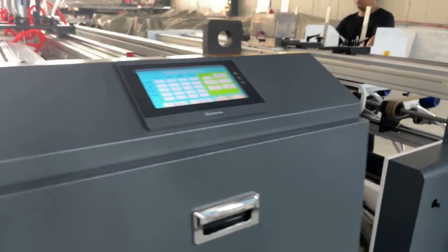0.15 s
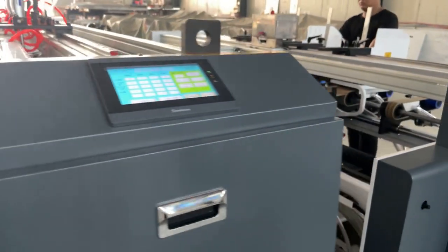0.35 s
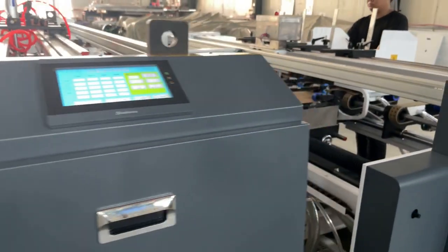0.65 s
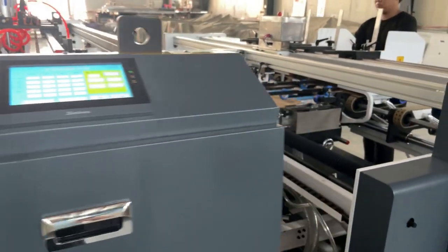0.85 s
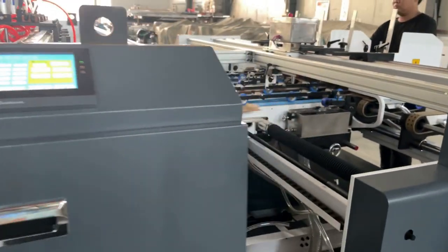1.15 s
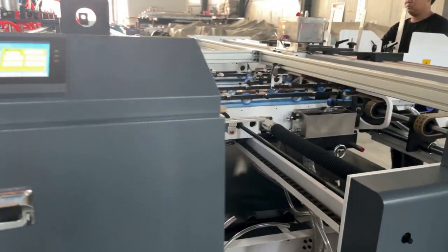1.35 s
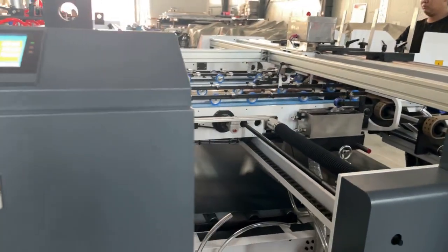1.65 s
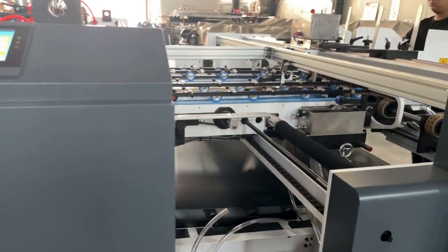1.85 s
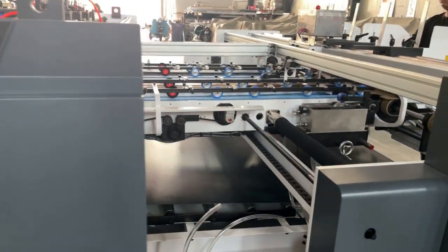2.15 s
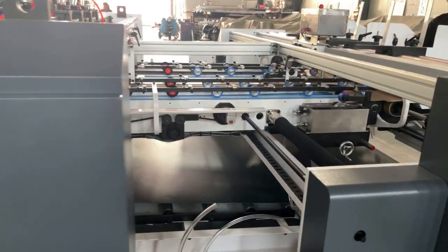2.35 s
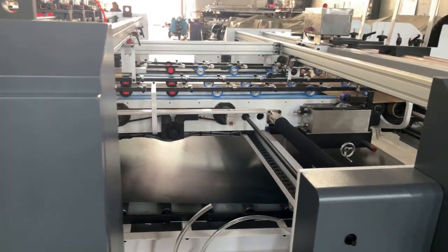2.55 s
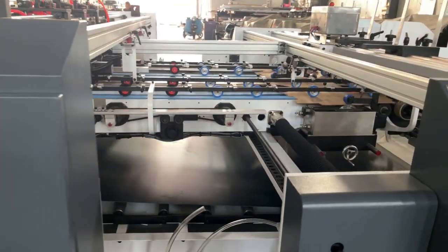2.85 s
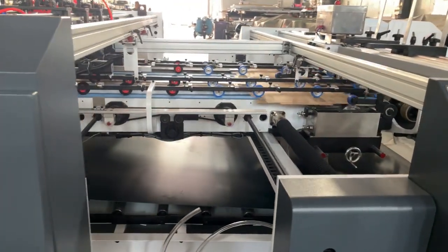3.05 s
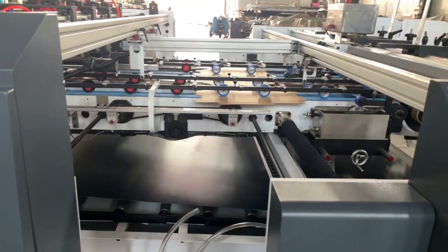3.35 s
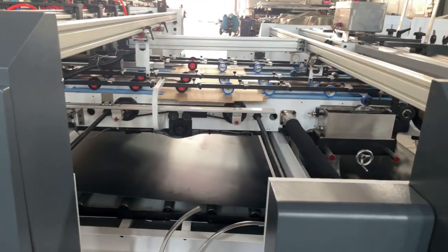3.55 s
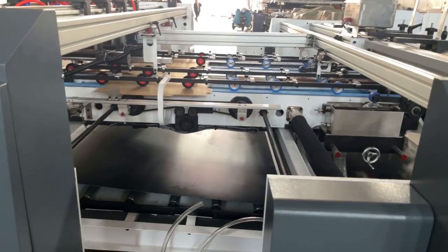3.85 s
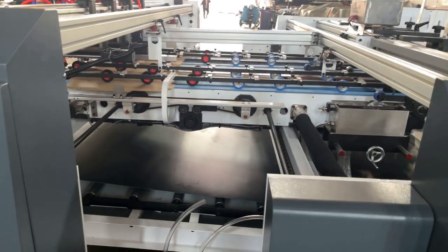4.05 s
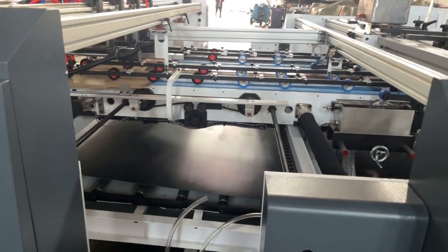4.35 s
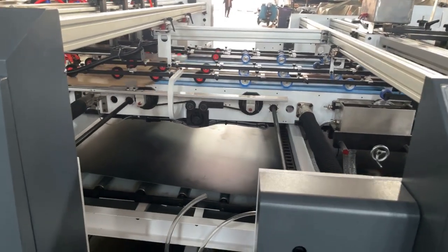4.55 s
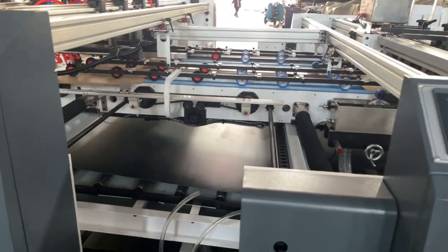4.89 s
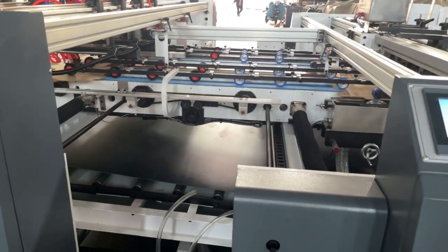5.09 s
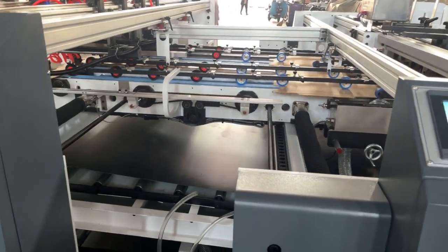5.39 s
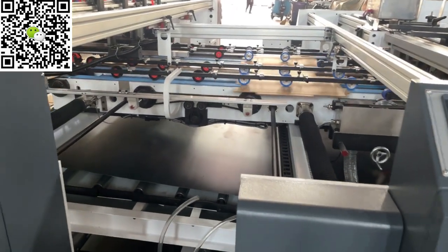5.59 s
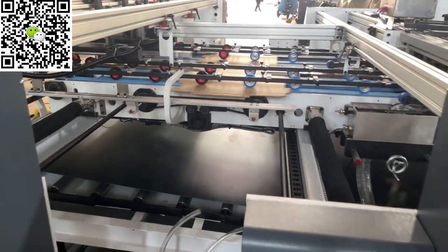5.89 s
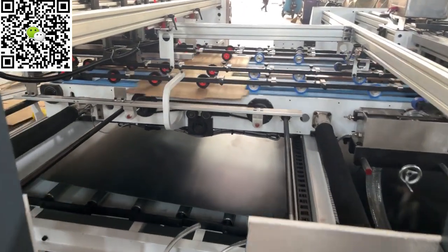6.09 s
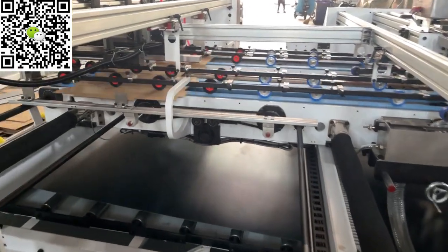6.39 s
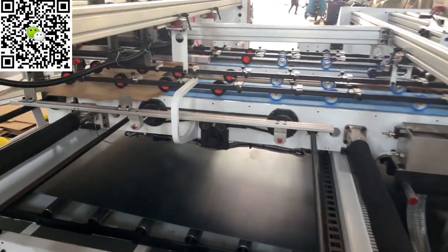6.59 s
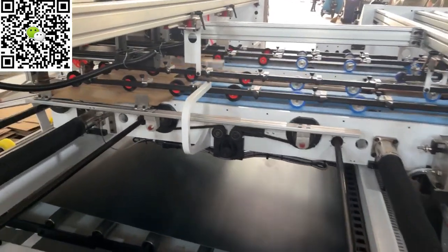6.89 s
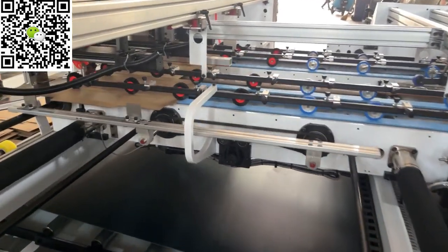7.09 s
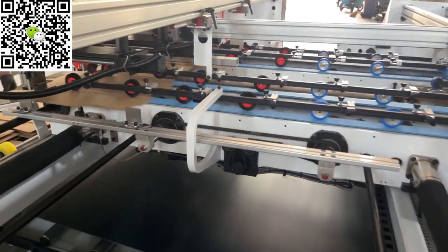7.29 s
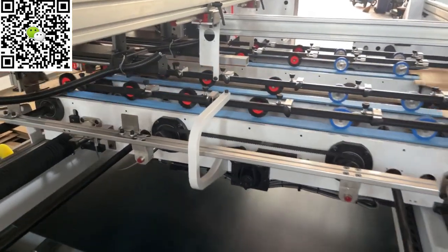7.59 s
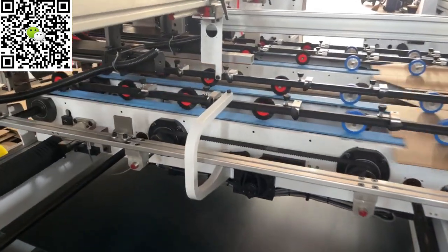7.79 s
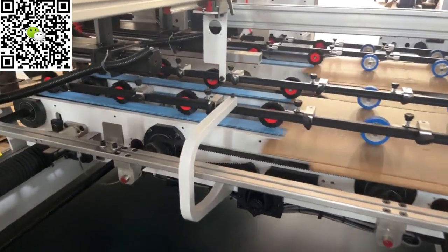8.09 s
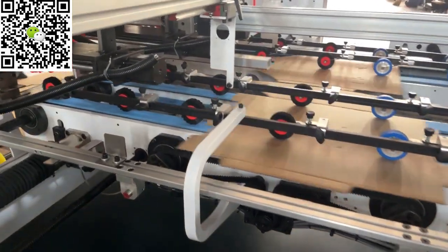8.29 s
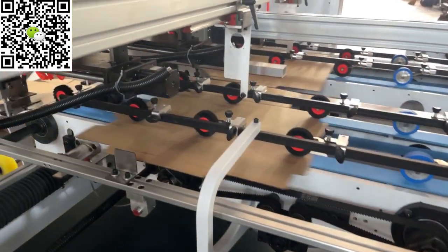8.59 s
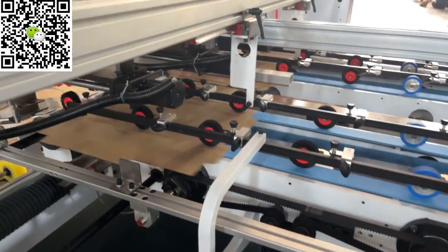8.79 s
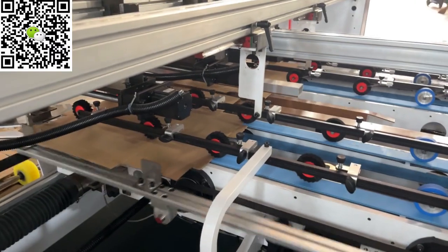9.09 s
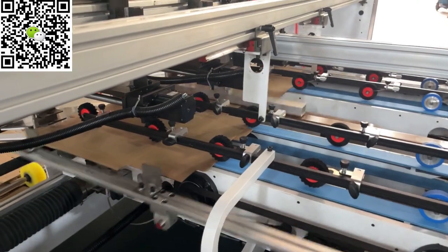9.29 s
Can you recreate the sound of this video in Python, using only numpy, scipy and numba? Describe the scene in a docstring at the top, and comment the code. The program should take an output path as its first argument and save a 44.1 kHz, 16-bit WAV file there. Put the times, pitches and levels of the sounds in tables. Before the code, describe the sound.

A factory machine hums and rumbles with hissing belts as cardboard sheets snap, scrape and slap through it every couple of seconds.

```python
"""A steady hum over rumbling rollers and hissing belts: a carton folder gluer runs in a factory hall.
About every 2.3 s a cardboard blank snaps into the rollers, slides, scrapes twice along the folding
guides, knocks and slaps its flaps down; each one loads the drive, so the hum swells.
Rollers squeak, bearings sing and the motor inverter whines thinly behind it all.
The hiss grows as the microphone moves in towards the belts."""
import sys
import numpy as np
from scipy import signal
from scipy.fft import rfft, irfft, next_fast_len
from scipy.io import wavfile
from scipy.ndimage import uniform_filter1d
from numba import njit

SR = 44100
rng = np.random.default_rng(int(sys.argv[2]) if len(sys.argv) > 2 else 0)


def wav_record(signal):
    """Record a signal, one row per channel, as 16-bit PCM in the file named by sys.argv[1]."""
    frames = np.transpose(np.atleast_2d(signal))
    bounded = np.clip(frames, -1, 1)
    # unit amplitude maps onto the largest positive 16-bit level
    quanta = np.round(bounded * 32767).astype(np.int16)
    wavfile.write(sys.argv[1], SR, quanta)


N = 416296

# each blank reaches the folding guides: (time [s], scrape and slap gain [dB], slide and snap gain [dB])
BLANKS = [(-.051, -4.5, -12), (2.272, -5, -11.5), (4.592, -4.5, -9), (6.922, -1, -7.5), (9.241, 1, -6)]
# between folds the feed rollers catch the next blank and it swishes off along the belts:
# (time [s], snap level [dB], slap level [dB], ring t60 [s], swish level [dB], swish hold [s])
FEEDS = [(1.219, -31.5, -29, 0.54, -45.5, 0.37), (3.473, -27.5, -23, 0.21, -58, .1),
         (5.759, -29, -25, 0.33, -39.5, 0.18), (8.041, -24.5, -21, 0.3, -44.5, 0.57)]
# the microphone comes round the cover and moves through the standing waves:
# (time [s], hum gain [dB], rumble gain [dB], hiss gain [dB])
MIC_PATH = [(0, 0, 1, -1), (.5, -1.5, -1, 0), (1.1, 1, 0, 0), (2.3, 0.9, 0, 0.9), (3.4, -0.5, 0, 1.5),
            (4.2, 1.5, 0, 2), (5.6, -1.5, -0.5, 0.5), (6.2, 0, 0, 2), (6.7, 1.5, 1.5, 2), (7.6, 0.5, 2, 3),
            (8.3, 2, 1, 4.5), (8.65, -4.5, 0.2, 3), (9.44, -0.5, -0.5, 4)]


def drive():
    """The main hum swells under load and beats against the tones of the other shafts."""
    # weaker shaft and gear tones: (pitch [Hz], relative level [dB])
    shaft_tones = [(65.9, -38), (87.5, -37.5), (90.8, -34.5), (96.2, -35.5), (113.7, -44), (144, -45),
                   (176.3, -40), (182.4, -38), (191.8, -39.5), (228.1, -39), (251, -42), (255.7, -53),
                   (335.8, -38.5), (455.6, -42.5), (460.9, -40.5), (512.8, -39), (527.6, -48), (541, -43),
                   (553.8, -47), (580.1, -46.5), (619.8, -49), (633.2, -50)]
    hum_hz, hum_db, swell_db = 170.83, -26.2, 2.4
    wobble_s = .00068  # the shafts run ahead or behind, so higher tones waver more
    hum = tone(hum_hz, drift=.041, flutter_db=1.17) * undb(hum_db + swell_db * load() + curve(MIC_PATH))
    shafts = sum(undb(db) * tone(hz, drift=2 * np.pi * hz * wobble_s, flutter_db=1.77)
                 for hz, db in shaft_tones)
    return hum + undb(-2) * shafts


def load(lag_s=.09, width_s=.19):
    """Effort of the drive, 0-1: one smooth swell as each blank folds."""
    return sum(np.exp(-.5 * ((clock() - s - lag_s) / width_s) ** 2) for s, _, _ in BLANKS)


def rollers():
    """Many small jolts rumble through the frame; the belts hiss over them. Both swell under load."""
    # spectra of the frame's rumble and the belts' hiss: (frequency [Hz], relative level [dB])
    rumble_spectrum = [(25, -34), (36, -33), (48, -5.5), (66, 3.5), (90, 5.5), (130, 2.5), (180, 3),
                       (270, -3), (370, -0.5), (500, -5), (700, -7.5), (1000, -13), (1500, -28),
                       (3000, -40)]
    belt_spectrum = [(400, -10), (900, -1.5), (1100, 2.5), (1350, 0.5), (1900, 2), (2150, -1.5), (2380, 3),
                     (2800, 0), (3500, -1), (4600, -4.5), (6000, -9.5), (9500, -12.5), (13000, -24.5),
                     (16000, -15)]
    effort = load()
    rumble = colour(grains(2500, spread_db=1), rumble_spectrum)
    rumble *= undb(-25.5 + 1.5 * effort + curve(MIC_PATH, axis=2))
    hiss = colour(grains(14000, spread_db=-1.5), belt_spectrum)
    hiss *= undb(-34 + effort + curve(MIC_PATH, axis=3) + .53 * walk(40))
    return rumble + panels(hiss)


def friction(swish_lag_s=.11, swish_attack_s=.11, swish_t60_s=.47):
    """Cardboard scrapes in fits on the guides and swishes over the belts."""
    # a blank scrapes twice on the guides and slides over the belts, harder during each scrape:
    # (offset from the blank [s], relative level [dB], attack [s], hold [s], release t60 [s])
    scrape_strokes = [(-.262, -22, 0.043, 0.033, 0.63), (.003, -22, 0.025, 0.034, 0.26)]
    slide_strokes = [(-.45, -31.5, .24, .42, .6), (-.25, -47, .05, .01, 0.22), (0, -42.5, .025, .03, .4)]
    # one blank drags on its way in: (time [s], level [dB], attack [s], hold [s], release t60 [s])
    drag = [(3.17, -34, 0.076, 0.25, 0.9)]
    # spectra of the throaty scrape and the airy slide: (frequency [Hz], relative level [dB])
    scrape_spectrum = [(150, 4), (350, 15), (700, 5), (1250, 5.5), (1700, 7.5), (2450, -18), (2800, 5),
                       (3600, 0), (5500, -12), (9000, -23), (16000, -38)]
    slide_spectrum = [(1000, -21), (3000, 7), (4500, 4), (7000, 3), (9500, 4), (13000, -3), (16000, 2)]
    swishes = [(s + swish_lag_s, db, swish_attack_s, hold, swish_t60_s) for s, *_, db, hold in FEEDS]
    scrapes = each_blank(scrape_strokes, axis=1)
    slides = each_blank(slide_strokes, axis=2) + swishes + drag
    rasp = colour(grains(9000, spread_db=-2), scrape_spectrum)
    scrape = unit(rasp + bending(scrapes)) * strokes(scrapes) * undb(.42 * walk(110))
    air = colour(grains(9000, spread_db=-3), slide_spectrum)
    slide = air * strokes(slides) * undb(1.5 + .34 * walk(60))
    return scrape + slide


def bending(scrapes, rise_share=.07, bend_s=.2):
    """The scraped board stiffens as it folds, so its hollow resonances climb."""
    # resonances of the bending blank: (pitch [Hz], width [Hz], level [dB])
    modes = [(876, 110, -11), (1096, 140, -11), (1515, 130, -6.5), (1790, 150, -8), (2090, 120, -9.5),
             (3200, 200, -15)]
    progress = curve([point for s, *_ in scrapes for point in [(s, -.5), (s + bend_s, .5)]])
    pitch = 1 + rise_share * progress + .0089 * walk(50)
    contact = grains(5000, spread_db=-1)
    return sum(undb(db) * unit(gliding(contact, hz * pitch, float(width))) for hz, width, db in modes)


def edges():
    """Board edges snap brightly; the wider flaps slap lower and ring hollow."""
    # edges snap on the rollers; flaps slap the guides as a blank enters, drops and twice after the fold:
    # (offset from the blank [s], relative level [dB], ring t60 [s], rise [s])
    edge_snaps = [(-.327, -26, 0.089, .003), (-.097, -18, 0.11, 0.0036), (.015, -23.5, 0.15, .004),
                  (.21, -23, .08, .003), (.442, -25, 0.11, 0.0036)]
    flap_slaps = [(-.232, -22.5, .06, .004), (-.003, -22.5, .09, 0.0044), (.153, -21.5, .1, .007),
                  (.234, -21, 0.09, .007)]
    # loose board rattles out of step with the cycle: (time [s], snap level [dB], slap level [dB])
    rattles = [(4.496, -55, -38), (5.765, -49, -24), (6.78, -27, -37), (7.354, -29.5, -36),
               (7.612, -45, -23), (8.825, -45, -19.5), (8.929, -44, -25), (9.161, -31, -23)]
    # spectra of a snap and a slap: (frequency [Hz], relative level [dB])
    snap_spectrum = [(500, 1), (2000, 12), (4500, 6), (7500, 10), (10000, 8), (13000, 1.5), (16000, 7)]
    slap_spectrum = [(200, -7), (600, 15.5), (1000, 8), (1500, 2.5), (2400, -1), (4000, 2), (7000, -18),
                     (16000, -13)]
    feed_rise_s, flap_lag_s, flap_rise_s = .007, .05, .0071
    rattle_t60_s, rattle_rise_s = .082, .0024
    snaps, slaps = each_blank(edge_snaps, axis=2), each_blank(flap_slaps, axis=1)
    for s, snap_db, slap_db, t60, *_ in FEEDS:
        snaps.append((s, snap_db, t60, feed_rise_s))
        slaps.append((s + flap_lag_s, slap_db, t60, flap_rise_s))
    for s, snap_db, slap_db in rattles:
        snaps.append((s, snap_db, rattle_t60_s, rattle_rise_s))
        slaps.append((s, slap_db, rattle_t60_s, rattle_rise_s))
    crisp = colour(grains(14000, spread_db=-3.5), snap_spectrum)
    hollow = body(colour(grains(10000, spread_db=2.5), slap_spectrum))
    return undb(1) * bursts(snaps, crisp) + undb(-.5) * bursts(slaps, hollow)


def body(x):
    """Add the hollow ring of the cardboard, at rms 1."""
    # resonances of a slapped blank: (pitch [Hz], width [Hz], relative level [dB])
    modes = [(1000, 180, -22), (1470, 200, -7), (1970, 140, -9), (2160, 330, -21)]
    return unit(x + sum(undb(db) * resonance(x, hz, width) for hz, width, db in modes))


def knocks():
    """A blank drops off a roller with a dull knock."""
    # the drops: (time [s], peak [dB], pitch [ratio])
    drops = [(2.2705, -10.5, 1.0), (3.535, -21, 1.2), (4.361, -17.5, 2), (4.5915, -10, 1.15),
             (6.324, -19, 1), (6.404, -18, 1.2), (6.70, -15, 1.1), (6.9195, -6.5, 1.14), (8.828, -15, 0.9),
             (9.2438, -5, .98)]
    # low modes of the board: (pitch [Hz], relative level [dB], t60 [s])
    modes = [(270, -3, .026), (377, 9, .014), (500, 5, .017), (700, -4, .014), (970, -12, .02)]
    return blows(drops, modes, contact_s=.007, chatter=.1, chatter_s=.006)


def taps():
    """A stiff folded flap gives a hollow, chattering tap."""
    # the flap's hits: (time [s], peak [dB], pitch [ratio])
    hits = [(2.061, -17.5, .95), (2.268, -19, 1), (2.426, -20, 1.02), (2.509, -23, 1), (4.747, -20, 1.02),
            (4.759, -21, 1), (4.829, -21, .99), (6.912, -14.5, .95), (7.072, -13.5, 1), (7.153, -17, .98),
            (8.105, -17, 1.09), (9.160, -16, 1.25), (9.398, -8, 1)]
    # modes of the flap: (pitch [Hz], relative level [dB], t60 [s])
    modes = [(952, 3.5, .022), (1320, 3, .025), (1800, -3, .026), (2500, -5, .028), (3350, -7, .024),
             (3930, -12, .02)]
    return blows(hits, modes, contact_s=.003, chatter=.6, chatter_s=.012)


def blows(rows, modes, contact_s, chatter, chatter_s):
    """Each blow rings well-damped board modes; a soft contact eases them in and chatters briefly."""
    out = np.zeros(N)
    for s, db, pitch in rows:
        start = int(s * SR)
        age = np.arange(min(N - start, SR // 4)) / SR
        ring = sum(undb(mode_db) * np.sin(2 * np.pi * hz * pitch * age) * decay(age, t60)
                   for hz, mode_db, t60 in modes)
        ring *= 1 - np.exp(-age / contact_s)
        touches = rng.standard_normal(len(age)) * np.exp(-age / chatter_s)
        ring += chatter * signal.fftconvolve(ring, touches / np.linalg.norm(touches))[:len(age)]
        out[start:start + len(age)] += undb(db) * ring / np.abs(ring).max()
    return out


def squeaks():
    """A roller sticks for a moment and sings on a wavering pitch."""
    # the roller sticks: (time [s], level [dB], ring t60 [s], rise [s], pitch [Hz])
    sticks = [(4.17, -41, .8, 0.054, 1395), (5.729, -34.5, .06, .009, 4430), (5.814, -30, 0.1, .006, 1414),
              (6.588, -38.5, .1, .013, 4470), (7.092, -32.5, .08, .014, 4120), (7.122, -37, .07, .01, 3965),
              (7.245, -36.5, .22, .026, 4150), (7.44, -32.5, .09, .014, 4120)]
    waver = 2.1 * walk(70)
    return sum(bursts([shape], np.sqrt(2) * np.sin(2 * np.pi * hz * clock() + waver))
               for *shape, hz in sticks)


def bearings():
    """The low bearing rubs and chirps twice in each turn of its roller; the high one sings in fits."""
    # how strongly they sing: (time [s], low bearing level [dB], high bearing level [dB])
    levels = [(0.0, -38, -54), (.5, -37, -52), (1.26, -45, -50), (2.26, -40, -49.5), (2.8, -42, -47.5),
              (3.6, -47, -45), (4.9, -46, -48), (5.4, -42, -47.5), (6.5, -44, -50), (7.1, -39, -46),
              (7.47, -36, -48), (7.61, -29, -48), (7.7, -36, -49), (7.79, -31, -48), (8.03, -35, -46),
              (8.12, -30, -42), (8.21, -33, -47), (8.26, -29.5, -49), (8.36, -28.5, -47), (8.41, -35, -46),
              (8.53, -31, -45), (8.6, -34, -46), (8.9, -34, -47), (9.44, -36, -41.5)]
    roller_hz, rub_at_s, rub_width_s, second_rub_db = 11.38, 8.356, .008, -2
    chirp_hz, waver_hz, fits_db = 1820, 20, 4
    ring_share = .27  # rings on between the rubs
    half_turns = 2 * roller_hz * (clock() - rub_at_s) + .05 * walk(9)
    nearest_rub = np.round(half_turns)
    rubs = np.exp(-.5 * ((half_turns - nearest_rub) / (2 * roller_hz * rub_width_s)) ** 2)
    rubs *= undb(second_rub_db * (nearest_rub % 2) + 1.7 * walk(23))
    singing = (1 - ring_share) * rubs + ring_share * undb(2 * walk(35))
    phase = 2 * np.pi * np.cumsum(chirp_hz + waver_hz * walk(90)) / SR
    low = np.sqrt(2) * np.sin(phase) * singing * undb(curve(levels) - 1.5)
    fits = fits_db * np.tanh(walk(13))
    whistle = resonance(rng.standard_normal(N), hz=4105, width_hz=60)
    high = resonance(whistle, hz=4120, width_hz=260) * undb(curve(levels, axis=2) + fits)
    return low + high


def inverter():
    """Thin switching tones that fade and swell in the standing waves of the hall."""
    # the switching tone as the microphone moves: (time [s], relative level [dB])
    carrier_levels = [(0.0, -56), (.33, -57), (.42, -49.5), (.62, -50), (.73, -59), (.84, -48.5),
                      (.97, -59), (1.1, -51), (1.3, -58), (1.52, -51), (1.74, -59), (1.87, -46.5),
                      (2.08, -54), (2.27, -47), (2.48, -54), (2.66, -47), (2.88, -57), (3.42, -45.5),
                      (3.8, -57), (4.0, -51), (4.3, -56), (4.72, -49), (4.87, -52), (5.02, -45.5),
                      (5.3, -45), (5.41, -56), (5.52, -46.5), (5.72, -46.5), (6.12, -53), (6.25, -47),
                      (6.4, -56), (6.83, -48), (7.1, -54), (7.32, -47), (7.6, -53), (7.72, -47),
                      (7.83, -56), (8.02, -44.5), (8.3, -50), (8.44, -40.5), (8.62, -41.5), (8.76, -54),
                      (8.92, -45), (9.1, -52), (9.44, -48)]
    # two tones below it fade in other places: (time [s], lower tone level [dB], upper tone level [dB])
    sideband_levels = [(0, -52, -60), (.45, -58, -53), (.73, -55, -50), (.95, -60, -62), (1.25, -54, -53),
                       (1.55, -59, -57), (1.8, -49.5, -55), (2.1, -57, -59), (2.35, -53, -52),
                       (2.5, -60, -61), (2.68, -50, -52), (3.05, -61, -58), (3.35, -51, -57),
                       (3.65, -59, -58), (3.95, -52, -49), (4.3, -49, -55), (4.75, -56, -50),
                       (5.1, -51, -51), (5.55, -61, -57), (5.74, -50, -51), (5.92, -60, -56),
                       (6.17, -49, -58), (6.32, -55, -58), (6.7, -48, -54), (7.15, -55, -52),
                       (7.5, -52.5, -52), (7.85, -57, -56), (8.1, -50, -53), (8.32, -53, -55),
                       (8.54, -45, -50), (8.75, -54, -56), (9.44, -52, -54)]
    # faint tones above it: (pitch [Hz], level [dB])
    upper_tones = [(5316, -59), (5376, -57), (9931, -66)]
    carrier = undb(curve(carrier_levels) + .8) * tone(hz=5000.5, drift=.5, flutter_db=.7)
    lower = sum(undb(curve(sideband_levels, axis)) * tone(hz, drift=1, flutter_db=3.5)
                for axis, hz in [(1, 4624), (2, 4682)])
    upper = sum(undb(db) * tone(hz, drift=.81, flutter_db=3) for hz, db in upper_tones)
    return carrier + lower + upper


def shade(x, above_hz=9500):
    """The covers shade the highest treble until the microphone leans in to a clear line of sight."""
    # treble past the covers: (time [s], gain [dB])
    treble_gain = [(0, -1), (3.3, -4.5), (5.8, -2.5), (7, 0), (9.44, 7)]
    low = signal.sosfiltfilt(signal.butter(2, above_hz, fs=SR, output="sos"), x)
    return low + (x - low) * undb(curve(treble_gain))


def panels(x, share=.17, count=12):
    """Close reflections from steel covers comb the spectrum."""
    response = np.zeros(SR // 80)
    echoes = share * rng.standard_normal(count) / np.sqrt(count)
    response[rng.integers(SR // 2000, len(response), count)] = echoes
    response[0] = 1
    return signal.fftconvolve(x, response / np.linalg.norm(response))[:N]


def hall(x, t60, wet_db):
    """Add a diffuse, dull tail from the factory walls."""
    age = np.arange(SR) / SR
    tail = rng.standard_normal(SR) * decay(age, t60) * (age > .012)
    tail = signal.sosfilt(signal.butter(1, 4000, fs=SR, output="sos"), tail)
    return x + undb(wet_db) * signal.fftconvolve(x, tail / np.linalg.norm(tail))[:N]


def each_blank(moves, axis):
    """Repeat the moves for every blank, with the gain in one column of its row."""
    return [(blank[0] + s, blank[axis] + db, *shape) for blank in BLANKS for s, db, *shape in moves]


def strokes(rows):
    """Envelope of a rubbing contact: it presses in, holds and lets go."""
    gain = np.zeros(N)
    t = clock()
    for s, db, attack, hold, t60 in rows:
        during = slice(*np.searchsorted(t, [s, s + attack + hold + t60]))
        age = t[during] - s
        release = decay(np.maximum(age - attack - hold, 0), t60)
        gain[during] += undb(db) * np.minimum(age / attack, 1) * release
    return gain


def bursts(rows, sound):
    """Shape a sound into hits that swell briefly and die away."""
    return sound * strokes([(s, db, rise, 0, t60) for s, db, t60, rise in rows])


def grains(per_s, spread_db):
    """Tiny contacts of uneven size, at rms 1."""
    struck = rng.random(N) < per_s / SR
    clicks = struck * rng.standard_normal(N)
    return unit(clicks * undb(spread_db * np.minimum(rng.exponential(size=N), 4)))


def tone(hz, drift, flutter_db):
    """A running tone that wavers at random in phase (drift, in radians) and in level."""
    phase = 2 * np.pi * (hz * clock() + rng.random()) + drift * walk(1.97)
    return np.sqrt(2) * np.sin(phase) * undb(flutter_db * walk(6))


def colour(x, points):
    """Give a sound a smooth spectrum, at rms 1."""
    hz, db = np.transpose(points)
    size = next_fast_len(N)
    bins_hz = np.maximum(np.fft.rfftfreq(size, 1 / SR), 1)
    gain = undb(np.interp(np.log(bins_hz), np.log(hz), db))
    return unit(irfft(rfft(x, size) * gain, size)[:N])


def resonance(x, hz, width_hz):
    """Ring one resonance, at rms 1."""
    return unit(signal.lfilter(*signal.iirpeak(hz, hz / width_hz, fs=SR), x))


@njit
def gliding(x, hz, width_hz):
    """Ring one resonance whose centre moves: a state-variable band-pass."""
    out, band_state, low_state = np.empty(len(x)), 0., 0.
    for i in range(len(x)):
        tuning, damping = np.tan(np.pi * hz[i] / SR), width_hz / hz[i]
        band = (band_state + tuning * (x[i] - low_state)) / (1 + tuning * (tuning + damping))
        band_state = 2 * band - band_state
        low_state += 2 * tuning * band
        out[i] = damping * band
    return out


def walk(rate):
    """Smooth random drift at rms 1, with rate steps a second."""
    span = int(SR / rate)
    steps = np.repeat(rng.standard_normal(N // span + 1), span)
    return unit(uniform_filter1d(uniform_filter1d(steps, span), span // 2)[:N])


def curve(rows, axis=1):
    """One column of a table, joined by straight lines in time."""
    rows = np.asarray(rows)
    return np.interp(clock(), rows[:, 0], rows[:, axis])


def decay(age, t60):
    """A fade that falls 60 dB in t60 seconds."""
    return np.exp(-np.log(1000) * age / t60)


def clock():
    """Time of every sample."""
    return np.arange(N) / SR


def undb(db):
    """Decibels to gain."""
    return 10 ** (np.asarray(db) / 20)


def unit(x):
    """Scale to rms 1."""
    return x / np.sqrt(np.mean(x ** 2))


def scene():
    """The running machine and the cardboard that passes through it."""
    cardboard = shade(knocks() + taps() + panels(friction()) + edges())
    folding = hall(cardboard + squeaks(), t60=.33, wet_db=-14.5)
    return (drive() + inverter() + rollers() + bearings() + folding)[None]


def record(dry):
    """The microphone port has a deep notch in the treble; the top is cut."""
    top_hz = 15700
    voiced = dry
    for notch_hz, width_hz in [(10900, 1170), (11400, 670)]:
        voiced = signal.lfilter(*signal.iirnotch(notch_hz, notch_hz / width_hz, fs=SR), voiced)
    return signal.sosfilt(signal.ellip(10, .2, 80, top_hz, fs=SR, output="sos"), voiced)


dry = scene()
out = record(dry)
wav_record(out)
```